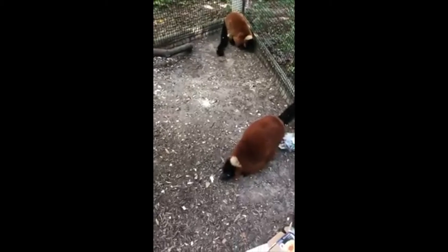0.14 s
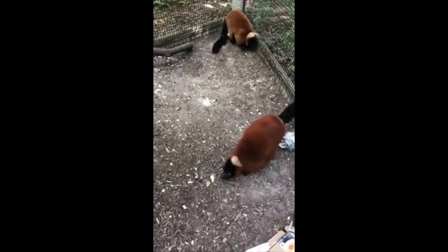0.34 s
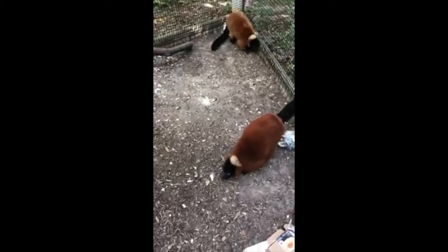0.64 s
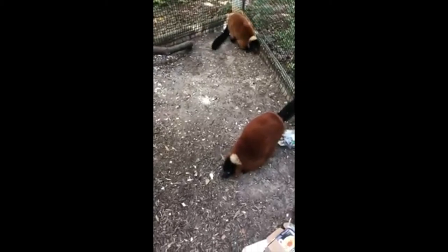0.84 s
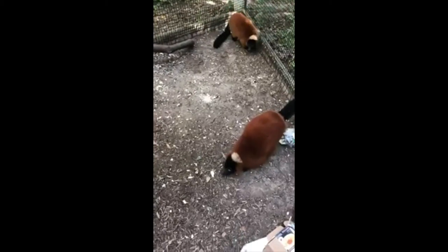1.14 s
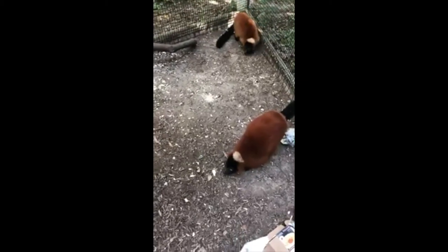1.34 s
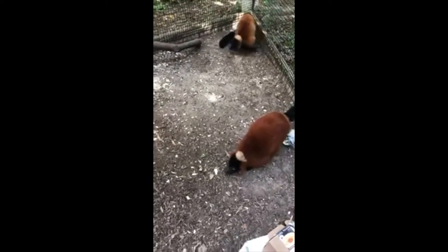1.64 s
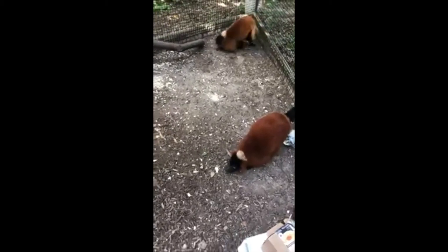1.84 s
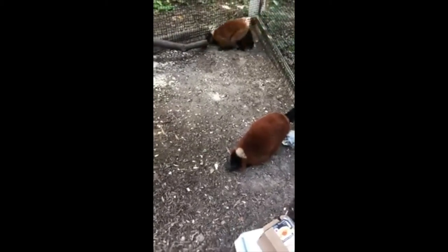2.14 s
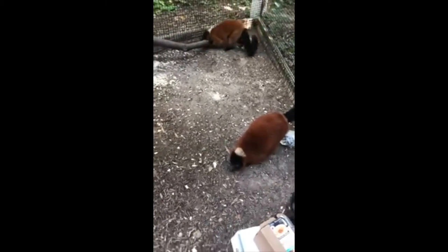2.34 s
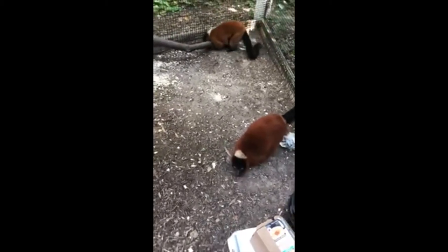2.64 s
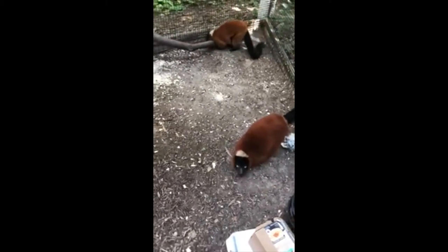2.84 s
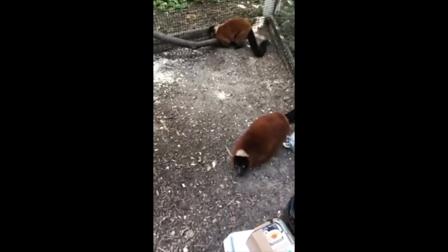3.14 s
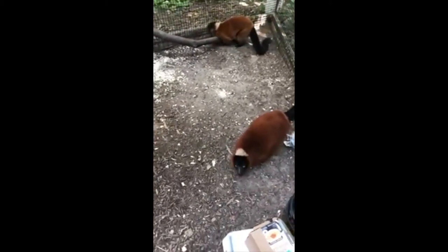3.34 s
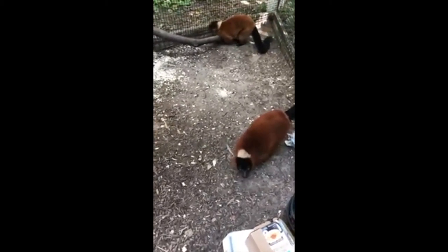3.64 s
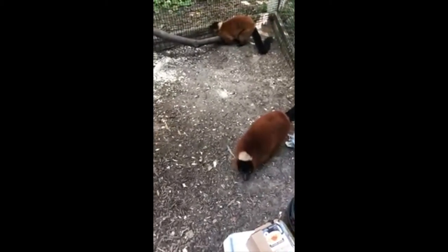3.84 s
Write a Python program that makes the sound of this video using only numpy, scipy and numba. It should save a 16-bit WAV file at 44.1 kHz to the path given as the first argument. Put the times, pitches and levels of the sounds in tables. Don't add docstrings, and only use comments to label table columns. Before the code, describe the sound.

Two lemurs call a few metres away outdoors: guttural, choking roars in quick succession and piercing unsteady cries, with duller moans from a third filling gaps; quiet air and a slightly rough phone pickup.

```python
import sys
import numpy as np
from scipy import signal
from scipy.fft import rfft, irfft
from scipy.io import wavfile
from scipy.ndimage import uniform_filter1d
from numba import njit

SR = 44100
rng = np.random.default_rng(int(sys.argv[2]) if len(sys.argv) > 2 else 0)


def persist_wave(psi):
    counts = np.round(np.clip(psi, -1, 1) * 32767).astype(np.int16)
    wavfile.write(sys.argv[1], SR, np.atleast_2d(counts).T)


def nominal_scale(level):
    x = np.asarray(level, float) / 20
    return 10 ** x


N = 176400
SECONDS = np.arange(N) / SR
LOW_CUT_HZ = 130


@njit
def svf(x, hz, width):
    y, band, low = np.empty(len(x)), 0., 0.
    for i in range(len(x)):
        g, damping = np.tan(np.pi * hz[i] / SR), width / hz[i]
        v = (band + g * (x[i] - low)) / (1 + g * (g + damping))
        band, low, y[i] = 2 * v - band, low + 2 * g * v, damping * v
    return y


@njit
def fire(hz, rough, chance, jitter, scatter):
    pulses, phase, p, k = np.zeros(len(hz) + 1), np.empty(len(hz)), 0., 0
    for i in range(len(hz)):
        step = hz[i] * np.exp(jitter * rough[i] * chance[k, 0]) / SR
        p += step
        if p >= 1:
            p, k = p - 1, k + 1
            size = np.exp(scatter * rough[i] * chance[k, 1])
            pulses[i] += size * p / step
            pulses[i + 1] += size * (1 - p / step)
        phase[i] = p
    return pulses[:-1], phase


def unit(x):
    return x / np.sqrt(np.mean(x ** 2))


def mouth(x, peaks):
    total = 0
    for k, (hz, width, db) in enumerate(peaks):
        centre = np.clip(hz + np.zeros(N), 50, 18000)
        once = svf(x, centre, 1.966 * width)
        twice = svf(once, centre, 1.966 * width)
        total = total + (-1) ** k * nominal_scale(db) * twice / np.sqrt(width)
    return total


def controls(calls, lead):
    attack_s, release_s = .004, .012
    rows, gate = np.concatenate(calls), 0
    for call in calls:
        rise = np.clip((SECONDS - call[0][0] + lead) / attack_s, 0, 1)
        fall = np.exp(-np.maximum(SECONDS - call[-1][0], 0) / release_s)
        gate = np.maximum(gate, rise * fall)
    curves = [np.interp(SECONDS, np.sort(rows[:, 0]), column) for column in rows.T[1:]]
    return curves[0], gate * nominal_scale(curves[1]), curves[2:]


def walk(rate):
    k = int(SR / rate)
    return unit(uniform_filter1d(uniform_filter1d(rng.standard_normal(N), k), k))


def throat_catches():
    # time in seconds, depth in dB.
    catches = [(0.109,8),(0.139,7.5),(0.164,7),(0.187,6),(0.207,6.5),(.232,3.5),(0.271,6.5),(0.321,7.5),(0.356,7),(0.386,8),(0.519,6),(.608,6.5),(.682,4),(.722,-5),(.765,4),(.798,6.5),(0.881,7.5),(0.897,2.5),(0.919,3.5),(0.937,5.5),(.985,10),(1.006,8.5),(1.043,3),(1.486,10),(1.557,-0.5),(1.61,-2),(1.64,4),(1.887,8),(1.909,12.5),(2.303,7),(2.778,5.5),(2.822,1),(3.052,4.5),(3.071,7),(3.096,9.5),(3.116,11),(3.14,11),(3.161,10.5),(3.183,9.5),(3.203,6.5),(3.65,10.5),(3.685,13),(3.925,8),(3.952,10),(3.992,6.5)]
    level_db = 0
    for start, depth_db in catches:
        bottom = start + .003
        width_s = np.where(SECONDS > bottom, .0035, .00072 * depth_db)
        level_db = level_db - 1.5 * depth_db * np.exp(-((SECONDS - bottom) / width_s) ** 2)
    return level_db


def roars():
    # time in seconds, pitch in Hz, level in dB.
    first_bout = [
        [(.03,198.3,-19),(.06,289.3,-15.5),(.2,292.5,-13),(.38,250.8,-18.5),(.435,226.6,-30)],
        [(.47,195.7,-17.5),(.51,321.8,-13),(.535,250.2,-14),(.56,253.5,-20),(.6,246.9,-18.5),(.715,225,-19.5)],
        [(.74,206.4,-21),(.78,300,-13),(1.0,283.9,-14),(1.08,207.6,-27)],
        [(1.405,186,-24.5),(1.46,270.2,-14.5),(1.57,295.3,-14),(1.6,214.8,-17),(1.735,177.9,-31.5)],
        [(1.835,193.9,-21.5),(1.87,329.5,-16),(1.92,279.2,-12.5),(1.95,193.5,-28)],
    ]
    second_bout = [
        [(2.142,175.2,-21),(2.18,198.8,-18),(2.21,292.5,-14),(2.32,262.1,-14.5),(2.43,195.7,-24.5)],
        [(2.742,217.9,-17.5),(2.76,280.1,-17.5),(2.79,309.1,-16.5),(2.835,205.6,-16.5),(2.87,233.9,-16.5),(2.945,245.5,-19.5)],
        [(2.98,191.8,-19),(3.03,260.2,-14.5),(3.11,303.9,-10),(3.19,268.5,-11.5),(3.212,230.5,-12.5),(3.225,206.2,-28.5)],
        [(3.523,208.7,-21.5),(3.56,185.6,-20.5),(3.585,166.5,-32)],
        [(3.605,194.6,-25.5),(3.635,225.4,-18),(3.71,211.4,-21),(3.78,254,-25.5),(3.805,240.3,-32)],
        [(3.83,178.4,-11),(3.87,216.2,-14),(3.91,300,-14.5),(3.995,300,-12)],
    ]
    roughness = [.6, .42, .6, .6, .35, .4, .25, .4, .4, .55, .35]
    # breathiness in dB, widest mouth in Hz, opening time in seconds, closing in Hz per second.
    manner = [(-19,1070,0.073,206.5),(-16,2063,0.083,4302),(-18.5,1167,0.059,202),(-20,1068,0.065,208),(-14.5,1520,0.081,102),(-15.5,1010,0.1,203),(-23,1990,0.14,3001),
              (-16,1265,0.02,33.5),(-14.5,1280,0.02,-1000),(-9.5,1635,0.023,602),(-5.5,778,0.072,-500)]
    # second resonance in Hz, its level in dB, third resonance in Hz, its level in dB.
    upper_mouth = [(1367,-15.5,2120,-22.5),(1910,-12.5,2600,-21),(1720,-13,2900,-27.5),(1590.3,-14,3000,-34),(1874,-11,2800,-25),(1546.5,-11.5,3000,-29),(1690,-15.5,2185,-23.5),
                   (1820,-7,3270,-18.5),(1850,-7.5,2450,-8),(2198.4,-9.5,2987,-22.5),(1690.4,-5,2950,-12.5)]
    # centre in Hz, width in Hz, level in dB.
    throat = [(265, 140, -9), (745, 140, 0), (3050, 300, -29), (3850, 350, -29), (4900, 700, -27),
              (6000, 900, -29), (7800, 1500, -30), (12000, 3000, -38)]
    lead_s, shut_hz = .0135, 731

    calls = first_bout + second_bout
    hz, gain, _ = controls(calls, lead_s)
    starts = np.array([call[0][0] - lead_s for call in calls])
    which = np.clip(np.searchsorted(starts, SECONDS) - 1, 0, None)
    since = SECONDS - starts[which]
    rough = np.array(roughness)[which]
    breath_db, wide_hz, opens_s, closing = np.array(manner)[which].T
    hz2, db2, hz3, db3 = np.array(upper_mouth)[which].T

    pulses, phase = fire(hz, rough, rng.standard_normal((4000, 2)), .17, .5)
    puff = unit(np.exp(-phase / .4) * rng.standard_normal(N))
    source = unit(pulses / np.sqrt(hz)) + 1.1 * rough * puff

    opening = 1 - np.exp(-(np.maximum(since, 0) / opens_s) ** 2)
    open_hz = wide_hz - closing * since.clip(0, .5)
    lips_hz = (shut_hz + (open_hz - shut_hz) * opening) * (1 + .03 * walk(25))

    chest = mouth(source, throat[:1])
    closed = nominal_scale(-5.5 * opening + 2.46 * walk(21)) * mouth(source, throat[1:2])
    lips = mouth(source, [(lips_hz, 193, 0)])
    low = signal.sosfilt(signal.butter(3, 1900, fs=SR, output="sos"), chest - closed - lips)
    upper = [(hz2 * (1 + .025 * walk(20)), 150, db2 - 3), (hz3 * (1 + .015 * walk(20)), 160, db3 - 3)]
    body = low + mouth(source + .5 * puff, upper)

    hiss = 0
    for peak in throat[2:]:
        hiss = hiss + nominal_scale(3 * walk(12)) * mouth(.5 * source + rng.standard_normal(N), [peak])
    voice = unit(body) + nominal_scale(breath_db - 5.1 * (2.5 - opening)) * unit(hiss)
    return voice * gain * nominal_scale(throat_catches() + 2.5 * rough * walk(60))


def shrieks():
    # time in seconds, pitch in Hz, level in dB, clearness from 0 to 1.
    cries = [
        [(0, 2100, -24, .9), (.03, 2700, -23, .88), (.065, 3450, -25, .9), (.088, 3450, -26, .9),
         (.105, 2700, -30, .6)],
        [(1.15, 1227, -27.5, .6), (1.175, 1400, -18, .6), (1.22, 1550, -17, 0.7), (1.3, 1450, -21, .6),
         (1.34, 1350, -19, 0.4), (1.372, 2700, -18, 0.75), (1.4, 2431, -21, 0.74), (1.425, 2930, -23, .75),
         (1.455, 2950, -24, 0.75), (1.478, 2600, -24.5, 0.7), (1.5, 1784, -22, 0.56), (1.555, 1490, -31.5, 0.5)],
        [(1.92, 1410, -40.5, 0.5), (1.98, 1806, -26, 0), (2.08, 1743, -23, 0.17), (2.11, 1757, -25.5, 0.95),
         (2.135, 2452, -23.5, 0.83), (2.16, 2980, -27, 0.8), (2.197, 2900, -28, 0.57)],
        [(3.86, 2740, -41.5, 0.06), (3.93, 3027, -26, 0.56), (3.96, 2950, -34, 0.49), (4.0, 2900, -49, .3)],
    ]
    # centre in Hz, width in Hz, level in dB.
    shriek_mouth = [(1000, 760, 2.5), (1810, 360, 3), (2820, 1000, -2.5), (12600, 5300, -3.5)]
    # time in seconds, centre in Hz, level in dB.
    ring = [(0, 5600, 0.5), (.1, 6430, -1.5), (1.15, 4800, -2), (1.191, 4907, 6.5), (1.31, 6240, 1.5),
            (1.36, 5890, 6), (1.55, 5940, 5), (1.94, 2450, 9), (2.0, 3488, -3), (2.07, 5155, -10),
            (2.14, 6000, 8.5), (2.198, 6100, 5), (3.86, 5700, -1.5), (4.0, 5890, 9)]

    hz, gain, (clear,) = controls(cries, .013)
    clear = np.clip(clear, 0, 1)
    turn = 2 * np.pi * np.cumsum(hz * (1 + (.09 - .07 * clear) * walk(500))) / SR
    breath = rng.standard_normal(N)
    cry, rasp = 0, .6 * svf(breath, 3.6 * hz, 3000.)
    for k in range(1, 9):
        rolloff = np.exp(-(k * hz / np.minimum(5.5 * hz, 11500)) ** 2)
        cry = cry + np.sin(k * turn) * nominal_scale(2.57 * walk(260)) * rolloff
        rasp = rasp + rolloff * svf(breath, np.minimum(k * hz, 18000), 800.)

    ring_s, ring_hz, ring_db = np.array(ring).T
    ring_hz, ring_db = np.interp(SECONDS, ring_s, ring_hz), np.interp(SECONDS, ring_s, ring_db)
    rings = [(ring_hz, 760, ring_db), (1.405 * ring_hz, 1100, ring_db - 3)]
    peaks = shriek_mouth[:3] + rings + shriek_mouth[3:]

    def even(x):
        return x / np.sqrt(uniform_filter1d(x ** 2, size=1200))

    tone, rasp = even(mouth(cry, peaks)), even(mouth(rasp, peaks))
    return gain * nominal_scale(2.7 * walk(31.3)) * (clear * tone + np.sqrt(1 - clear ** 2) * rasp)


def moans():
    # time in seconds, pitch in Hz, level in dB.
    far_calls = [
        [(1.05, 228.4, -23), (1.1, 218.8, -22.5), (1.13, 185, -43)],
        [(1.16, 235, -52), (1.25, 255, -42), (1.3, 250, -56), (1.33, 250, -22.5), (1.385, 270, -37.5)],
        [(1.7, 297, -27.5), (1.77, 279.8, -35.5), (1.81, 237.8, -38.5)],
        [(1.99, 289.7, -37), (2.05, 300, -30), (2.11, 280.3, -38)],
        [(2.44, 258.3, -28), (2.5, 270.8, -29), (2.54, 378, -34), (2.62, 399.6, -40.5), (2.645, 326.2, -27.5),
         (2.67, 288, -26.5), (2.71, 235.8, -41)],
        [(3.23, 256.5, -28), (3.29, 245.6, -60), (3.315, 279.1, -65), (3.325, 290, -37.5), (3.36, 288.5, -37),
         (3.372, 294.4, -23), (3.4, 265, -28.5), (3.42, 251.6, -45), (3.464, 260, -57), (3.472, 270, -34),
         (3.49, 270, -39), (3.5, 255.2, -48)],
    ]
    # centre in Hz, width in Hz, level in dB.
    moan_mouth = [(300, 110, -18.5), (550, 50, -30), (801, 111.7, -0.5), (1108, 91, -5), (1980, 150, -19),
                  (2270, 115, -29.5), (2990, 50, -36.5), (3930, 160, -34), (5118, 500, -31)]
    hz, gain, _ = controls(far_calls, .024)
    pulses, _ = fire(hz, np.ones(N), rng.standard_normal((4000, 2)), .02, .15)
    source = pulses / np.sqrt(hz) + .003 * rng.standard_normal(N)
    return gain * unit(mouth(source, moan_mouth))


def pen_echo(voices):
    echo_db, t60_s = -24, .2
    t = np.arange(SR // 2) / SR
    dull = signal.lfilter([1], [1, -.7], rng.standard_normal(len(t)))
    tail = dull * nominal_scale(-60 * t / t60_s) * (t > .004)
    return nominal_scale(echo_db) * signal.fftconvolve(voices, tail / np.sqrt(np.sum(tail ** 2)))[:N]


def air():
    # frequency in Hz, level in dB per Hz.
    spectrum = [(30, 1), (180, 2.5), (400, -17.5), (9000, -39.5)]
    f = np.fft.rfftfreq(N, 1 / SR) + 1
    hz, db = np.array(spectrum).T
    shape = nominal_scale(np.interp(np.log(f), np.log(hz), db))
    noise = irfft(rfft(rng.standard_normal(N)) * shape, N)
    return unit(noise) * nominal_scale(-48.5 + 2 * walk(6))


def scene():
    low_cut = signal.butter(4, LOW_CUT_HZ, "high", fs=SR, output="sos")
    voices = signal.sosfilt(low_cut, roars() + shrieks() + moans())
    return (voices + pen_echo(voices) + air())[None]


def band_limit(x):
    return signal.sosfilt(signal.butter(12, 15690, fs=SR, output="sos"), x)


def record(dry):
    limit = .47
    rounded = limit * np.tanh(dry / limit)
    b, a = signal.butter(1, LOW_CUT_HZ, "high", fs=SR)
    return band_limit(signal.lfilter(b, a, rounded))


dry = scene()
out = record(dry)
persist_wave(out)
```